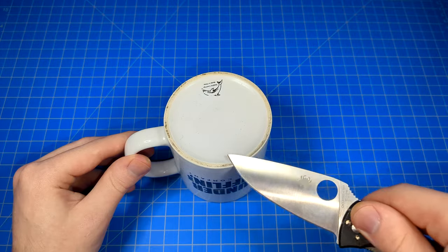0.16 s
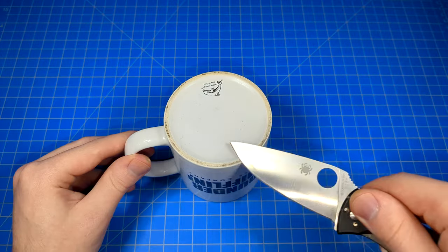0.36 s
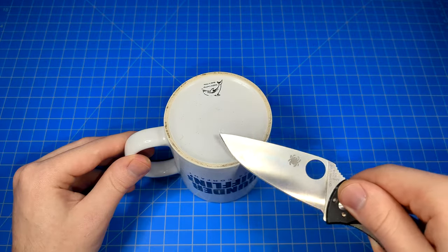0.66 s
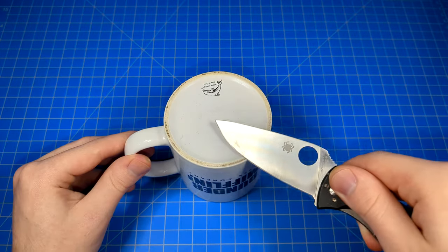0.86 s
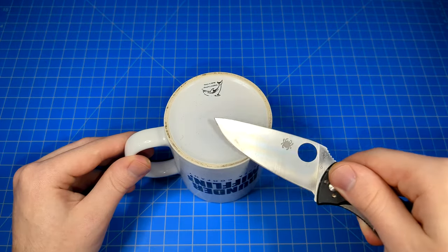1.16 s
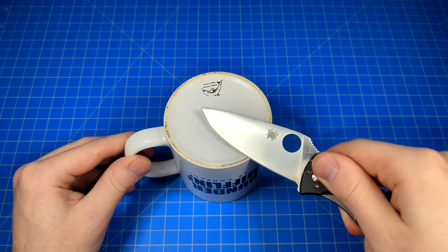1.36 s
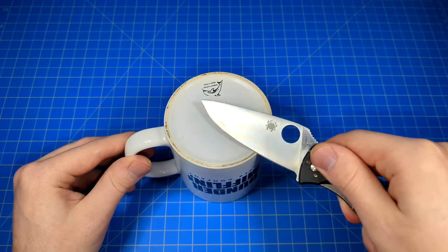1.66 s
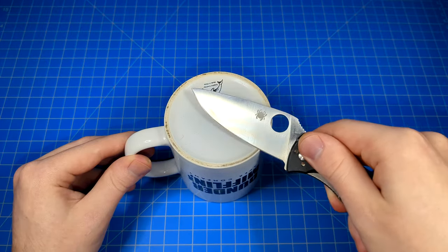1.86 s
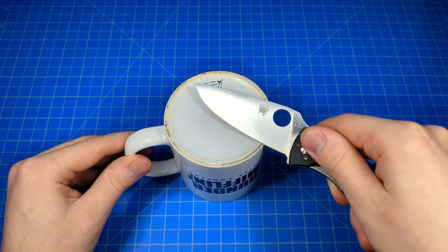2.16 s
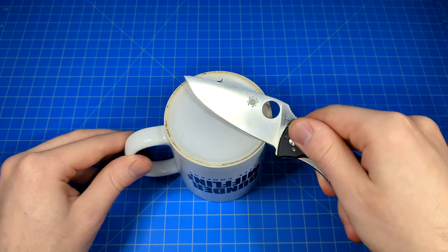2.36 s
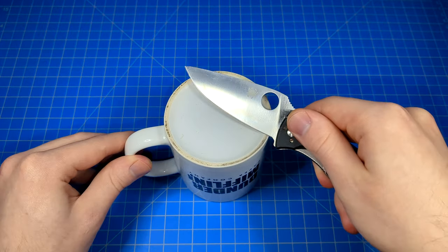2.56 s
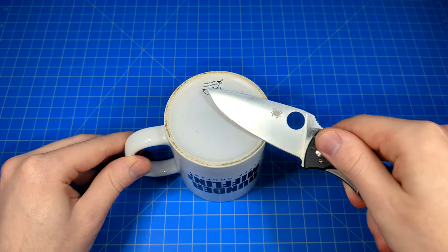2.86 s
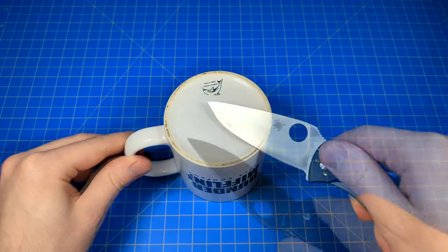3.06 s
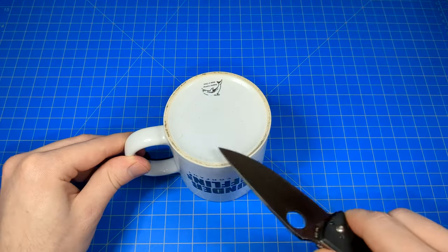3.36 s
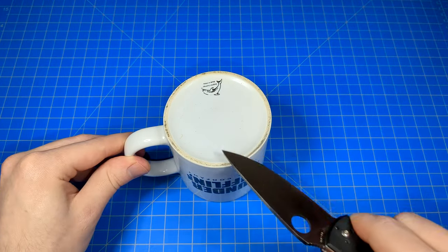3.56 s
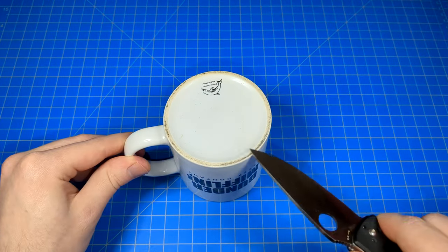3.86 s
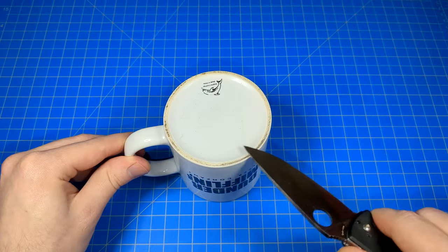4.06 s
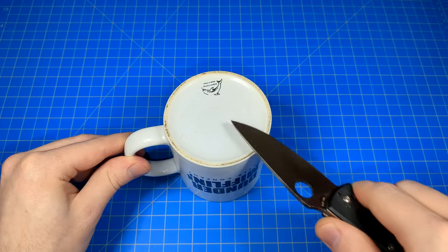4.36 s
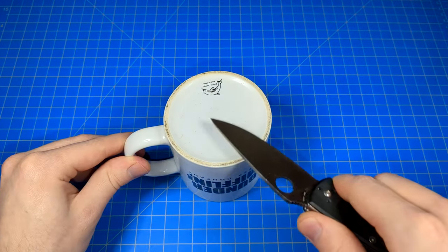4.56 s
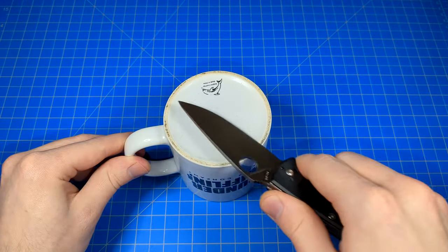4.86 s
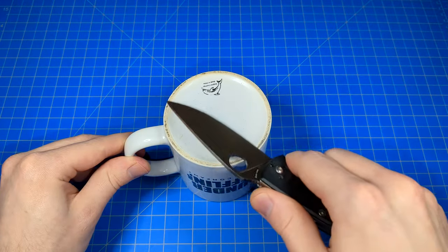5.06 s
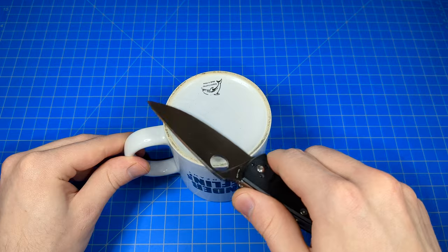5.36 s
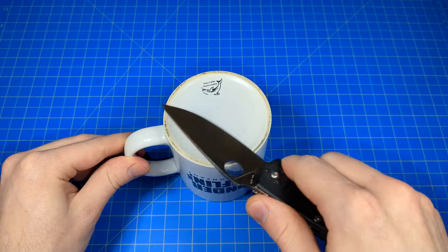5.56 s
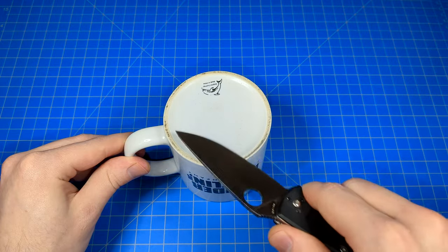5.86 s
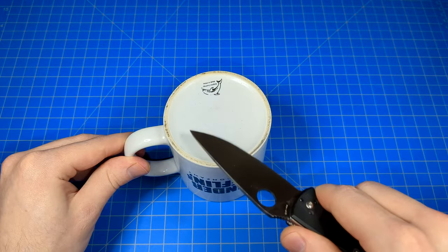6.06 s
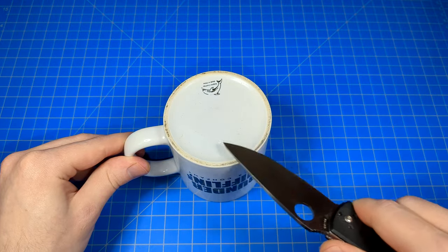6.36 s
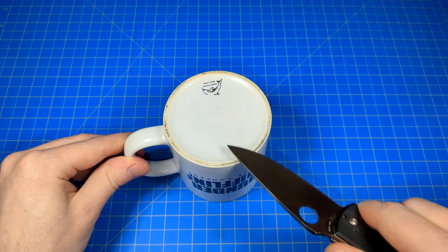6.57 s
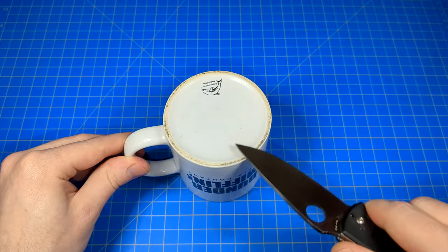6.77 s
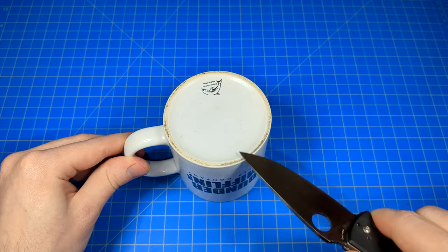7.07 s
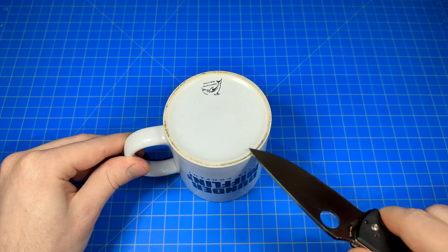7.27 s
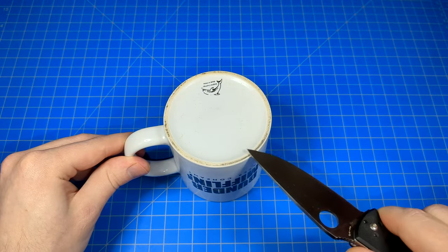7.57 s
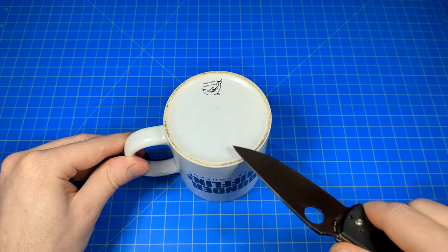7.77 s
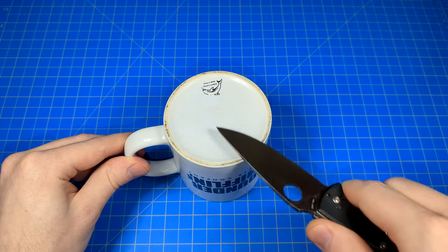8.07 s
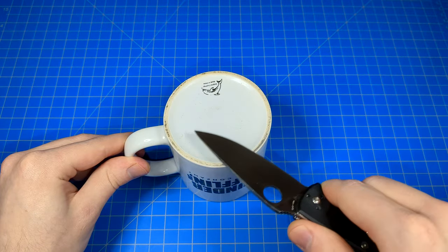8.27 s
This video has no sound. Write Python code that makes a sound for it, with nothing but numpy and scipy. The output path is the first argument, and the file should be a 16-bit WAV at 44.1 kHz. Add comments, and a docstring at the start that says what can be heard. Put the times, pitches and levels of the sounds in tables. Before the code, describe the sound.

A steel pocket knife scrapes back and forth on the unglazed foot of an upturned mug from the start, about nine short strokes a second. The rasp is gritty and bright, with a shifting metallic ring and a thin, very high whistle. Faint squeaks come in the first half second, and clearer squeals from 1 to 1.8 seconds. The strokes then soften until nearly 3 seconds.

At about 3.1 seconds a second knife takes over without a gap, slightly different in tone and more sharply pulsed. It peaks with two brief squeals around 4 seconds, grows quiet between 5 and 5.8, then builds again. The strongest stretch, from about 6.6 to 7.7 seconds, brings a run of squeals, and the scraping continues a little softer until about 8.5 seconds. Throughout, the mug thrums faintly and hollowly. Everything sounds close, in a small, dry room with a low rumble.

```python
"""A small, dry room. Two pocket knives, one after the other, are honed on the unglazed foot ring of an
upturned mug, about nine strokes a second. Grit catches the edge and drives the blade's resonances,
which shift as the contact travels between tip and heel. The edge squeals and whistles as it sticks
and slips; the mug and the air under it thrum, over a low room rumble."""
import sys
import numpy as np
from scipy import signal
from scipy.fft import rfft, irfft
from scipy.io import wavfile
from scipy.ndimage import uniform_filter1d

SR = 44100
rng = np.random.default_rng(int(sys.argv[2]) if len(sys.argv) > 2 else 0)


def to_wav(sig):
    """Store sig (one row per channel, or 1-D mono) as 16-bit WAV at the path in sys.argv[1].

    Samples outside -1..1 are clipped; the rate is SR.
    """
    pcm = np.clip(np.atleast_2d(sig), -1, 1) * 32767
    pcm = np.round(pcm).astype(np.int16)
    wavfile.write(sys.argv[1], SR, pcm.T)  # frames by channels


N = 371763
TIME = np.arange(N) / SR
KNIFE_CHANGE_S, ORDINARY_RASP_DB = 3.122, -18.5


# Strokes, forth and back in turn. Each row: start in seconds, rasp level in dB, dip at the opening
# turn in dB (none if negative), swell along the stroke in dB.
HONING_STROKES = [(0.0, -25.5, -1.5, 1.5), (0.113, -24.0, 3.0, -2.5), (0.229, -22, 10, -1),
                  (0.352, -20.5, 3.5, -4.5), (0.464, -22.5, 17, -3), (0.562, -22, 3.5, -5.0),
                  (0.685, -22, 9, 2), (0.823, -23, 6.0, -10.5), (0.957, -22.5, -1, -2),
                  (1.065, -21.5, 0.0, -7.5), (1.184, -18.5, 6.0, -1.5), (1.281, -19, 5.0, -6),
                  (1.407, -19.5, 7.5, -1.5), (1.5, -20.5, 3, -6.0), (1.663, -21.5, 7.0, -0.0),
                  (1.807, -28.5, 2, -8), (1.936, -25, -2, -2.5), (2.053, -30.5, -3.5, -7),
                  (2.162, -22, 2.5, 3), (2.281, -28, 7, -11.5), (2.405, -28, 8.0, -6.5),
                  (2.549, -33, -2.5, 4), (2.677, -27.0, -1, -1), (2.746, -27, 22, 2),
                  (2.884, -21.5, -1, -1.5), (2.961, -22.5, 6.5, -2.5), (3.123, -19.5, 5, 2.5),
                  (3.265, -18.5, 14.5, 0), (3.382, -19.0, 6.5, -3), (3.514, -18.5, 18.5, -5.5),
                  (3.635, -20, 5.5, -7.5), (3.758, -22, 14.0, 6), (3.871, -13.5, 6.5, -2),
                  (4.002, -20, 8.5, 1.5), (4.096, -15, 11.0, 1), (4.21, -22.5, 8.5, -8.5),
                  (4.332, -21.5, 13.0, 0.5), (4.441, -19.5, 2.0, -9), (4.566, -19, 19, -0.5),
                  (4.674, -22.5, 6.0, -6), (4.813, -23.5, 16.5, 2), (4.923, -27.5, 3.5, -8.0),
                  (5.045, -26, 9.5, 0), (5.158, -28.5, 7.5, -8.5), (5.284, -33, 12.5, 0),
                  (5.374, -30.5, 11, 6), (5.477, -27, 3.5, 0), (5.599, -30, 7.0, 1),
                  (5.727, -26.5, 1.5, -4), (5.839, -25.0, 25.0, -2), (5.968, -21.0, 4.5, -4.0),
                  (6.077, -24.5, 10.5, 3.5), (6.179, -18, 7.5, -5), (6.315, -21.5, 17.5, -3),
                  (6.444, -16, 4.0, -1.0), (6.538, -19.5, 12.5, -2.5), (6.667, -16, 5.5, -4.5),
                  (6.778, -15.5, 8.5, 3), (6.899, -14, 7.5, 2), (7.023, -16.5, 9, -3.5),
                  (7.149, -16.5, 5, -2.5), (7.253, -16.5, 13.5, -8.5), (7.376, -18.5, 11.5, 2.5),
                  (7.461, -23.5, 7.5, -10.5), (7.582, -19.5, 17, -3.5), (7.687, -24.0, 5, -0.5),
                  (7.798, -21, 13, -3.5), (7.912, -17.0, 2.5, 0), (8.032, -18.5, 28, -1.5),
                  (8.158, -25.5, -2.5, -5.0), (8.275, -23.5, 6.5, -2.5), (8.391, -22.5, 0, -2.5)]

def hand(last_turn_s=8.5, stick_s=0.024, brake_s=0.027, handover=0.3):
    """Each stroke bites, swells or fades, then brakes. Returns rasp level in dB, speed and travel."""
    start, level_db, dip_db, swell_db = np.transpose(HONING_STROKES)
    turns = np.append(start, last_turn_s)
    dip_db = np.append(np.maximum(dip_db, 0), 0)
    phase = np.interp(TIME, turns, np.arange(len(turns)))
    stroke = phase.astype(int)
    sticking_db = dip_db[stroke] * np.exp(-np.abs((TIME - turns[stroke]) / stick_s) ** 2.7)
    braking_db = dip_db[stroke + 1] * np.exp(-((turns[stroke + 1] - TIME) / brake_s) ** 2)
    # over the handover share at either end of a stroke, the pressure blends into its neighbour's
    held_phase = np.arange(len(start))[:, None] + [handover, 1 - handover]
    held_db = level_db[:, None] + np.outer(swell_db, [-.5, .5])
    pressure_db = np.interp(phase, held_phase.ravel(), held_db.ravel())
    speed = rms_one(0.056 + np.abs(np.sin(np.pi * phase)) ** 0.88)   # almost still at every turn
    return pressure_db - sticking_db - braking_db, speed, np.cos(np.pi * phase)


def catching(judder_db=1.5, judder_hz=130, grain_db=0.6, grain_hz=700):
    """The edge judders over the ceramic and catches on its finer grain."""
    return rms_one(from_db(judder_db * flutter(judder_hz) + grain_db * flutter(grain_hz)))


def grit_ring(modes, contact, bite, tilt_db=0):
    """Dense grit impacts ring each mode, as strongly as contact point and blade tilt couple to it."""
    out = 0
    for hz, width_hz, *coupling_db in modes:
        edges_hz = np.clip([hz - 0.67 * width_hz, hz + 0.66 * width_hz], 20, .48 * SR)
        band = signal.butter(2, edges_hz, "band", fs=SR, output="sos")
        grit = (rng.random((2, len(bite))) - .5) * bite
        ringing = rms_one(signal.sosfilt(np.vstack([band, band]), grit))   # twice, for deep valleys
        tilt = np.interp(TIME[:len(bite)] * 20, np.arange(200), rng.uniform(-1, 1, 200))   # 20 a second
        out = out + stereo(ringing, hz) * from_db(by_contact(coupling_db, contact) + tilt_db * tilt)
    return out


# Resonances of each blade; among the second knife's rows, the narrow one at 2388 Hz is a line of the mug. #
# Each row: pitch in Hz, width in Hz, then relative level in dB with the contact at the tip, at the belly and at
# the heel.
FIRST_BLADE_MODES = [(1490, 430, -22, -12.5, -86), (1885, 345, -14, -17.5, -11.5),
                     (2072, 380, -6.5, -15, -19), (2719, 236, -7, -1, -17), (3510, 820, -14, -10, -14),
                     (4235, 1100, -1, -20, -21.5), (5030, 920, -31, -10.5, -17.5),
                     (6140, 280, -22, -20, -12.5), (6650, 580, -5.5, -24, -16),
                     (7490, 590, -10.5, -26.5, -24), (8400, 2300, -43, -6.5, -61),
                     (9320, 1470, -3.5, -15.5, -13), (11580, 1020, -9, -15, -15),
                     (12900, 940, -3.5, -22.5, -12.5), (15000, 1600, -14, -20, -18)]
SECOND_BLADE_MODES = [(1556, 503, -15.5, -12.5, -29), (1999, 200, 8.5, -20, -15),
                      (2388, 46, -23, -13.5, -25), (2729, 428, -2.5, -10, -16), (3744, 620, -65, -1.5, -21),
                      (3796, 305, 13, -28, -12), (4520, 190, -11.5, -21.5, -24.5),
                      (5050, 480, -16, -11.5, -22.5), (5864, 530, -19.5, -16, -21.5),
                      (6550, 820, -1, -31, -15.5), (8320, 2640, -9.5, -16, -19.5),
                      (9310, 1370, -14, -19.5, -13.5), (11580, 970, -1.5, -15, -51.5),
                      (12050, 1340, -13, -13, -7.5), (14850, 1500, -12, -22, -13.5)]

def blades(contact, bite, tilt_db=6.5):
    """Grit rings the first blade, then the second; no two strokes ring quite alike."""
    change = round(KNIFE_CHANGE_S * SR)
    return np.hstack([grit_ring(FIRST_BLADE_MODES, contact[:change], bite[:change], tilt_db),
                      grit_ring(SECOND_BLADE_MODES, contact[change:], bite[change:], tilt_db)])


def stick_slip(hz, wander_hz, wander_rate_hz, burst_db, burst_hz):
    """A self-excited blade vibration: the grit jostles its pitch and it comes in short bursts."""
    bursts = rms_one(from_db(burst_db * np.tanh(flutter(burst_hz))))
    pitches = [hz + wander_hz * flutter(wander_rate_hz) for _ in range(2)]
    pair = np.sqrt(2) * np.sin(2 * np.pi * np.cumsum(pitches, axis=1) / SR)
    return bursts * stereo(pair, np.mean(hz))


# Squeals of the edge. Each row: start and end in seconds, top pitch in Hz, sag by the end in Hz,
# peak level over the scrape in dB.
EDGE_SQUEALS = [(0, 0.205, 4450, 400, -9), (.22, .42, 4650, 1300, -8), (.47, .57, 3800, 300, -7),
                (1.03, 1.181, 2880, 200, 1.5), (1.27, 1.4, 3000, 250, 1), (1.41, 1.617, 3020, 420, 2),
                (1.67, 1.82, 2780, 150, -1.5), (3.86, 4.012, 3830, 200, 0), (4.1, 4.207, 3750, 200, -2.5),
                (6.66, 6.816, 3880, 600, -1), (6.87, 7.082, 4030, 600, -0.5), (7.13, 7.379, 4020, 150, 0),
                (7.39, 7.564, 3980, 150, 2), (7.57, 7.726, 4080, 750, -2.5)]

def squeals(crest=0.38, overtone_db=-12, overtone_ratio=1.65):
    """Each stick-slip squeal swells and fades as its pitch arches and sags. Returns sound and gain."""
    start, end, top_hz, sag_hz, level_db = np.transpose(EDGE_SQUEALS)
    row = np.maximum(np.searchsorted(start, TIME) - 1, 0)
    progress = np.clip((TIME - start[row]) / (end - start)[row], 0, 1)
    hz = top_hz[row] - sag_hz[row] * ((progress - crest) / (1 - crest)) ** 2
    tone = stick_slip(hz, wander_hz=71.8, wander_rate_hz=123.3, burst_db=9.5, burst_hz=94)
    overtone = stick_slip(overtone_ratio * hz, wander_hz=129.6, wander_rate_hz=360,
                          burst_db=9, burst_hz=110)
    gain = from_db(level_db[row]) * np.abs(np.sin(np.pi * progress)) ** 0.57
    return gain * (tone + from_db(overtone_db) * overtone), gain


# The high whistle at ordinary speed and pressure: pitch in Hz, then level in dB, each with the contact
# at the tip, at the belly and at the heel.
EDGE_WHISTLE_HZ = (11260, 12030, 12530)
EDGE_WHISTLE_DB = (-34, -35.5, -23.5)

def whistle(contact, speed, rasp_db, swoop_hz=480, rasp_share=0.85):
    """The edge whistles highest and loudest at the heel, and rises with the speed of each stroke."""
    hz = by_contact(EDGE_WHISTLE_HZ, contact) + swoop_hz * (speed - 1)
    level_db = by_contact(EDGE_WHISTLE_DB, contact) + rasp_share * (rasp_db - ORDINARY_RASP_DB)
    tone = stick_slip(hz, wander_hz=95, wander_rate_hz=420, burst_db=11, burst_hz=136)
    return from_db(level_db) * np.sqrt(speed) * tone


# Resonances of mug and held knife on the mat. Each row: pitch in Hz, width in Hz, then relative level
# in dB with the contact at the tip, at the belly and at the heel.
MUG_MODES = [(139.8, 42, 20.5, -2, -5), (297.2, 28, 3, -2.5, 3), (637, 63, -22, -18.5, -3.5),
             (766, 255, 15.5, -2, -4.5), (1264, 166, 22, -6.5, -12.5)]
# Trim of the thrum, one row per knife. Each row: gain in dB at the tip, at the belly and at the heel.
THRUM_TRIM_DB = [(-80.5, -52, -41), (-70, -54, -42)]

def thrum(contact, bite):
    """Mug and knife rock together, the harder the more blade overhangs."""
    body = grit_ring(MUG_MODES, contact, bite) + rocking(contact, bite)
    return from_db(by_knife(THRUM_TRIM_DB, contact)) * body


def rocking(contact, bite, tip_hz=720, belly_hz=470, heel_hz=315):
    """The knife rocks on the rim: a low resonance that sinks as more of the blade overhangs."""
    grip_bend = 1 + 0.2 * np.tanh(flutter(5))
    hz = by_contact([tip_hz, belly_hz, heel_hz], contact) * grip_bend
    ringing = rms_one(gliding_band(hz, half_width_hz=38) * np.sqrt(bite))
    return stereo([ringing, 0], heel_hz)


# Hollow ring of the knife rocking on the rim, one row per knife, as each loads it differently. Each row: values
# at the tip, # at the belly and at the heel, as pitch in Hz in the first table and gain in dB in the second.
HOLLOW_RING_HZ = [(785, 765, 720), (765, 675, 760)]
HOLLOW_TRIM_DB = [(-43, -43.5, -68), (-38, -40.5, -46.5)]

def hollow_ring(contact, speed, bite, swoop_hz=90):
    """The knife rocks hollow on the rim near the tip, its pitch arching with each stroke, left and right out of
    step."""
    hz = by_knife(HOLLOW_RING_HZ, contact) + swoop_hz * (speed - 1)
    ringing = gliding_band(hz, half_width_hz=28, phase_rad=np.array([[.5], [-.5]]))
    return from_db(by_knife(HOLLOW_TRIM_DB, contact)) * rms_one(ringing * bite)


def wall_chime(bite, hz=7555, width_hz=71):
    """The thin ring of the ceramic wall, the same wherever the blade touches."""
    return grit_ring([(hz, width_hz, 0, 0, 0)], 0, bite)


def near_echoes(x, travel, path_shift=0.038, bounce=0.42):
    """Bounces off the mug and the mat comb the sound; their paths change as the blade travels."""
    out = x.copy()
    for side, delays_s in enumerate([(.00115, .0026), (.00121, .0025)]):
        for delay_s in delays_s:
            moving_delay_s = delay_s * (1 + path_shift * (travel + flutter(3.5)))
            out[side] += bounce * np.interp(TIME - moving_delay_s, TIME, x[side])
    return out / np.sqrt(1 + 2 * bounce ** 2)


def room(x, t60_s=0.11, wet_db=-19):
    """Adds faint reflections from the table and the walls."""
    t = np.arange(SR // 3) / SR
    tail = rng.standard_normal((2, len(t))) * from_db(-60 * t / t60_s) * (t > .002)
    tail /= np.sqrt(np.sum(tail ** 2, axis=1, keepdims=True))
    return x + from_db(wet_db) * signal.fftconvolve(x, tail, axes=1)[:, :N]


# Tone of the room's rumble ahead of its roll-off. Each row: frequency in Hz, relative level in dB.
RUMBLE_SPECTRUM = [(25, -24.5), (125, 2), (210, -14), (600, -22.5)]

def rumble(level_db=-53.5, rolloff_hz=900):
    """Steady low rumble of the room."""
    hz = np.arange(N // 2 + 1) * SR / N + 1
    shape = from_db(at_hz(RUMBLE_SPECTRUM, hz)) / (1 + (hz / rolloff_hz) ** 2)
    noise = irfft(rfft(rng.standard_normal((2, N))) * shape, N)
    return from_db(level_db) * stereo(rms_one(noise), hz=100)


# Stereo width. Each row: frequency in Hz, likeness of left and right from 0 to 1.
STEREO_LIKENESS = [(290, .9), (2500, .96), (7000, .45)]
# Panning. Each row: frequency in Hz, left over right in dB.
STEREO_BALANCE = [(350, -4.5), (700, -0.5), (2200, -2), (4400, 3), (8000, 0)]

def stereo(pair, hz):
    """Mixes two unrelated signals as mid and side, with the width and panning of this pitch."""
    alike = at_hz(STEREO_LIKENESS, hz)
    mid, side = np.sqrt((1 + alike) / 2) * pair[0], np.sqrt((1 - alike) / 2) * pair[1]
    lean = from_db(at_hz(STEREO_BALANCE, hz) / 2)
    return np.array([(mid + side) * lean, (mid - side) / lean])


def flutter(rate_hz):
    """Random wavering up to about the given rate, with a spread of 1."""
    step, run_in = 8, 2000   # samples per draw, draws for the filter to settle
    lowpass = signal.butter(2, min(rate_hz * step, .45 * SR), fs=SR, output="sos")
    slow = rms_one(signal.sosfilt(lowpass, rng.standard_normal(N // step + run_in + 2))[run_in:])
    return np.interp(np.arange(N) / step, np.arange(len(slow)), slow)


def gliding_band(hz, half_width_hz, phase_rad=0):
    """A narrow band of noise around a moving pitch."""
    angle = 2 * np.pi * np.cumsum(hz) / SR + phase_rad
    return flutter(half_width_hz) * np.cos(angle) + flutter(half_width_hz) * np.sin(angle)


def evened(x, window_s=0.063):
    """Holds the loudness steady while the colour changes."""
    return x / np.sqrt(uniform_filter1d(np.mean(x ** 2, axis=0), int(window_s * SR)) + 1e-12)


def by_contact(values, contact):
    """Blends the values at tip, belly and heel."""
    return np.interp(contact, np.arange(3), values)


def by_knife(table, contact):
    """Blends by contact point, from the first row until the knives are swapped, then the second."""
    first, second = (by_contact(row, contact) for row in table)
    return np.where(TIME < KNIFE_CHANGE_S, first, second)


def at_hz(points, hz):
    """Reads a curve along a logarithmic frequency axis."""
    points_hz, values = np.transpose(points)
    return np.interp(np.log(hz), np.log(points_hz), values)


def from_db(db):
    """Decibels to amplitude."""
    return 10 ** (np.asarray(db) / 20)


def rms_one(x):
    """Scales to an RMS of 1."""
    return x / np.sqrt(np.mean(x ** 2) + 1e-20)


# Where the edge touches the mug. Each row: time in seconds, position (0 tip, 1 belly, 2 or more heel).
CONTACT_PATH = [(.29, 0), (.42, 0.88), (.85, 1.4), (1.35, 1.28), (1.72, 1.32), (1.9, 1.7), (2.75, 2),
                (2.95, 1.34), (3.76, 0.82), (3.94, 0.2), (4.3, 1.21), (5, 1.63), (5.35, 3), (5.65, 1.63),
                (6.3, 1.34), (6.95, 0.37), (7.6, 0.45), (8.35, 1.73)]

def scene(chime_db=-26, mug_rasp_share=0.11):
    """The same strokes drive blade and mug; the mug follows their speed and, a little, their rasp."""
    rasp_db, speed, travel = hand()
    contact = np.interp(TIME, *np.transpose(CONTACT_PATH))
    bite = catching()
    squeal, squeal_gain = squeals()
    chime = from_db(chime_db) * wall_chime(bite)
    scrape = evened(near_echoes(blades(contact, bite), travel))   # its loudness is left to the hand
    rasp = (scrape + squeal) / np.sqrt(1 + squeal_gain ** 2)   # a squeal takes energy from the scrape
    edge = from_db(rasp_db) * (rasp + chime) + whistle(contact, speed, rasp_db)
    mug_drive = rms_one(speed ** 1.5) * from_db(mug_rasp_share * (rasp_db - ORDINARY_RASP_DB))
    return room(edge) + mug_drive * (thrum(contact, bite) + hollow_ring(contact, speed, bite)) + rumble()


def record(dry, cutoff_hz=15800):
    """Rounds the highest peaks and cuts the top of the treble."""
    rounded = 1.138 * np.tanh(dry / 1.09)
    return signal.sosfilt(signal.ellip(12, .1, 80, cutoff_hz, fs=SR, output="sos"), rounded)


dry = scene()
out = record(dry)
to_wav(out)
```